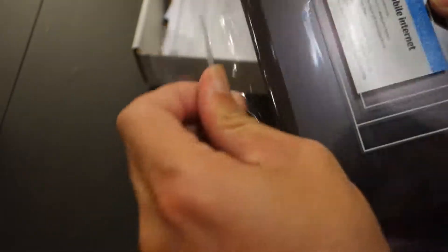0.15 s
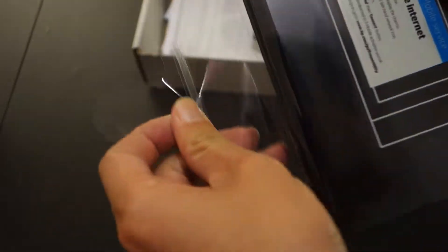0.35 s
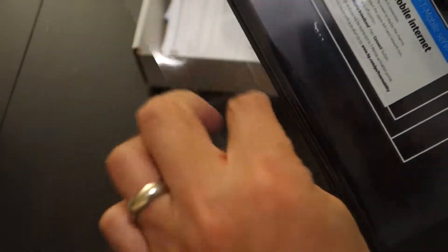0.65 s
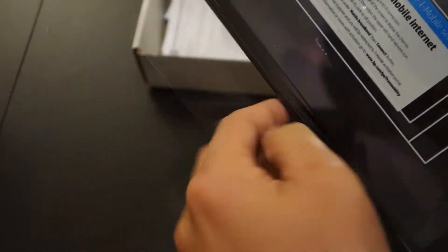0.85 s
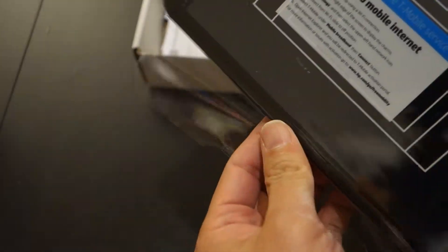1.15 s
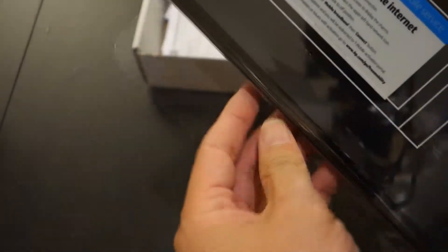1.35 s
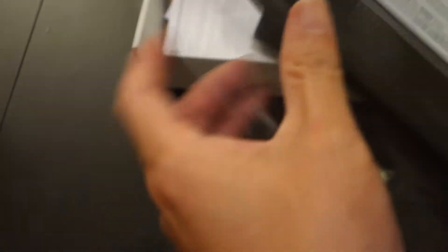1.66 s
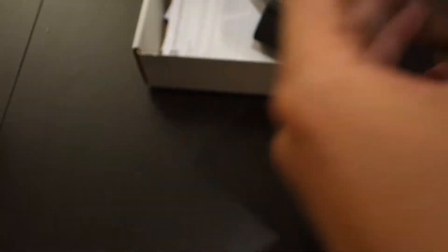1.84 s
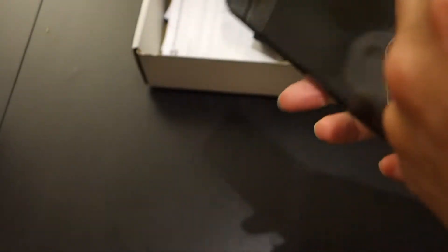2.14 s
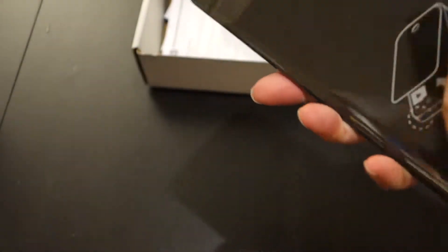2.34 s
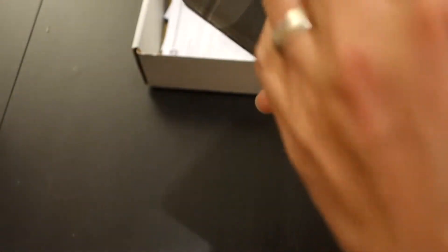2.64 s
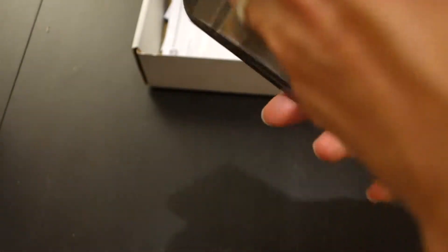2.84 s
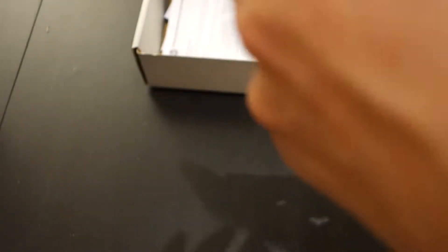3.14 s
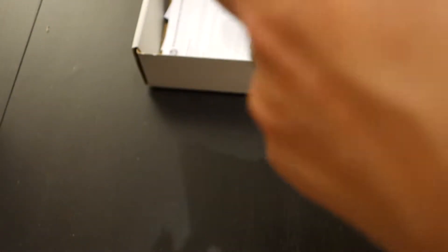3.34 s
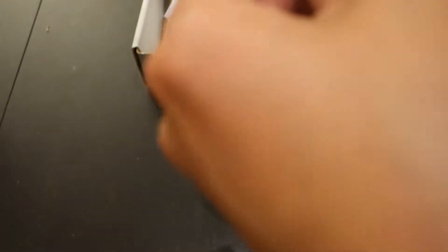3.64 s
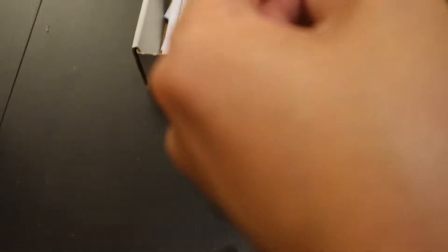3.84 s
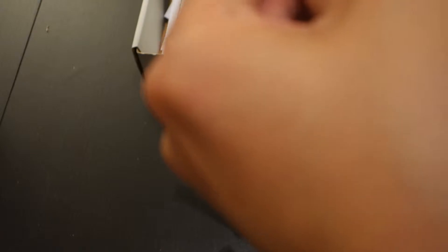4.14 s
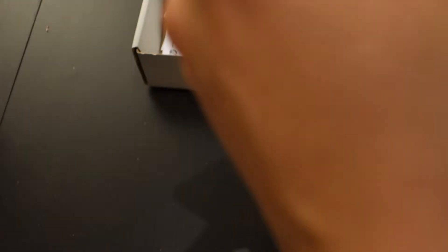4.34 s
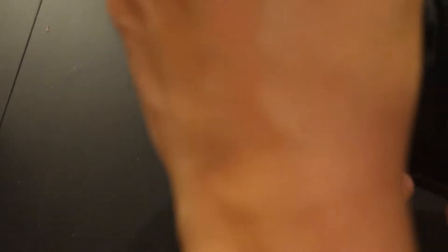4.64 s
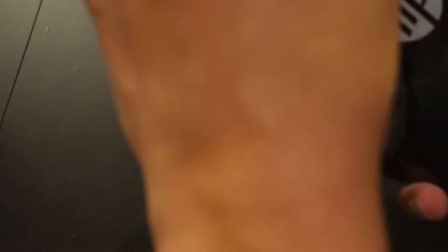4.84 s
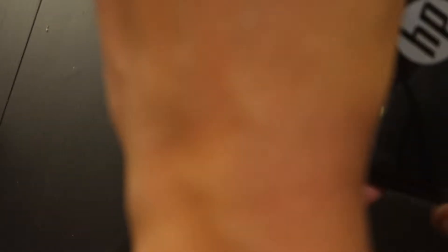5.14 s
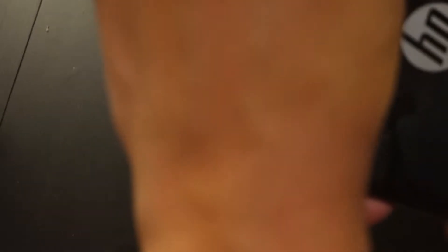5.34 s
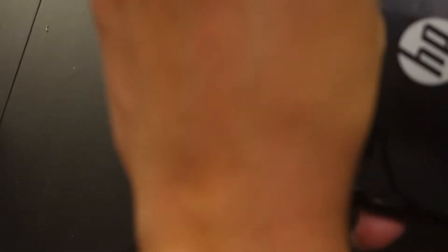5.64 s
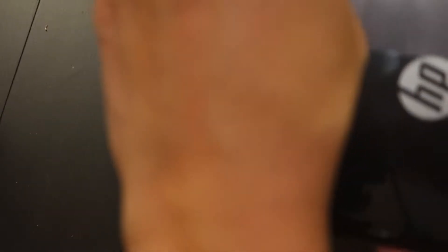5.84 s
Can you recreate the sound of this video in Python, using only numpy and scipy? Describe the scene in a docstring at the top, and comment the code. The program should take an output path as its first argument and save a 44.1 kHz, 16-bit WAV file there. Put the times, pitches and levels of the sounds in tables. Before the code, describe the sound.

Thin plastic wrapping crackles and pops as it is tugged off a hand-held device in uneven pulls. The stretched film rubs and hisses while fingers bump the casing softly. The handling pauses briefly, resumes with lighter crackles and tiny ticks, then gives another loud run of crinkles and fades. Everything is close, over the faint hush of a quiet room.

```python
"""Hands peel clear plastic film off a flat device, close to the microphone in a quiet room.
From the start, short pulls drag the film loose in many tiny slips. Creases snap, fingertips knock
softly on the casing and tight patches of film pop. From about one second, stretched film also rubs.
After a lull and more crackling, the film creeps off in faint ticks around the four-second mark.
Then it crackles loudly again and dies down to a light rustle."""
import sys
import numpy as np
from scipy import signal
from scipy.fft import rfft, irfft, next_fast_len
from scipy.io import wavfile
from scipy.ndimage import uniform_filter1d, map_coordinates

SR = 44100
rng = np.random.default_rng(int(sys.argv[2]) if len(sys.argv) > 2 else 0)


def generate_wav(sig):
    """Save sig (samples, or channels by samples) to the path in sys.argv[1] as 16-bit PCM at SR."""
    pcm = np.round(np.clip(np.atleast_2d(sig).T, -1, 1) * 32767).astype(np.int16)
    wavfile.write(sys.argv[1], SR, pcm)


N = 264159
TOP_HZ = 16500


def amp(db):
    """Turn decibels into a number to multiply by."""
    return 10 ** (np.asarray(db) / 20)


def unit(x):
    """Scale a sound to an average strength (rms) of 1."""
    return x / np.sqrt(np.mean(x ** 2) + 1e-20)


def along(points, hz):
    """Read between the rows of a (pitch_hz, value) table, with octaves evenly spaced."""
    pitches, values = np.transpose(points)
    return np.interp(np.log(hz + 1), np.log(pitches), values)


def filtered(x, response):
    """Turn each frequency of a sound up or down, and shift it in time, as response(hz) says."""
    n = x.shape[-1]
    padded = next_fast_len(n + min(n, SR // 4))
    return irfft(rfft(x, padded) * response(np.fft.rfftfreq(padded, 1 / SR)), padded)[..., :n]


def causal(points, hz):
    """A filter from (pitch_hz, level_db) rows that never sounds before its cause (minimum phase)."""
    cepstrum = irfft(np.log(amp(along(points, hz))))
    forward_only = np.r_[1, np.full(len(hz) - 2, 2), 1, np.zeros(len(hz) - 2)]
    return np.exp(rfft(cepstrum * forward_only))


def wobble(rate):
    """A smooth curve through `rate` random values a second."""
    values = rng.standard_normal(int(N * rate / SR) + 4)
    return map_coordinates(values, [np.arange(N) * rate / SR])


def add(track, start_s, level_db, sound):
    """Mix in a short sound, giving it as much energy as 1 ms at level_db."""
    energy = np.mean(np.sum(sound ** 2, axis=-1)) / (SR / 1000)
    part = track[:, int(start_s * SR):][:, :sound.shape[-1]]
    part += amp(level_db) * sound[..., :part.shape[1]] / np.sqrt(energy)


# How alike left and right sound (1 is the same): pitch_hz, likeness
LIKENESS = [(450, 0.95), (1000, 0.82), (2400, 0.64), (9000, 0.53)]
def spread(pair):
    """Share two unrelated sounds between left and right: alike in the bass, less so in the treble."""
    turn = lambda hz: np.arccos(np.clip(along(LIKENESS, hz), 0, 1)) / 2
    mid, side = filtered(pair, lambda hz: np.array([np.cos(turn(hz)), np.sin(turn(hz))]))
    return np.array([mid + side, mid - side])


# The tone of the still room: pitch_hz, relative_db
HUSH_TONE = [(25, -17.5), (100, -6), (320, 8), (600, 5.5), (16000, -9)]
def hush():
    """The quiet room gives a steady, soft noise."""
    noise = spread(rng.standard_normal((2, N)))
    return unit(filtered(noise, lambda hz: amp(along(HUSH_TONE, hz))))


# Pulls that drag the film along: start_s, length_s, rustle_db, hiss_above_rustle_db
FILM_PULLS = [(0, 0.097, -43.5, 6), (0.084, 0.045, -36, 11.5), (0.14, 0.014, -26, 1.5),
              (0.171, 0.032, -32.5, -2), (0.282, 0.022, -43, 3), (0.391, 0.15, -54.5, 9.5),
              (0.497, 0.022, -36.5, -0.5), (0.584, 0.03, -49.5, 7.5), (0.929, 0.13, -42.5, -7.5),
              (1.028, 0.034, -34.5, -17), (1.237, 0.051, -71, 22.5), (1.362, 0.15, -44, 1.5),
              (1.493, 0.12, -46.5, 3.5), (1.642, 0.075, -52.5, 7), (1.764, 0.033, -40, 1),
              (1.842, 0.024, -38, 7.5), (1.865, 0.12, -43, 3), (2.003, 0.115, -43.5, 6),
              (2.23, 0.04, -53, 4.5), (2.259, 0.084, -46, -6), (2.983, 0.012, -51, 6.5),
              (3.028, 0.09, -43, 0.5), (3.178, 0.052, -54, 8.5), (3.222, 0.01, -44, 9.5),
              (3.453, 0.016, -55, 16.5), (3.49, 0.11, -45, 3.5), (4.015, .15, -64, 10),
              (4.236, 0.031, -44.5, 10.5), (4.269, 0.042, -32, 1.5), (4.551, 0.017, -37, 3.5),
              (4.612, 0.011, -43, 1.5), (4.733, 0.034, -45, -4.5), (4.776, 0.09, -40, 2),
              (4.987, 0.02, -43.5, 0.5), (5.039, 0.038, -46, 8.5), (5.224, 0.011, -54, 9.5),
              (5.387, 0.08, -64.5, 16), (5.533, 0.017, -51, 7.5), (5.589, 0.07, -52.5, 6.5)]
# Loose film brushing the hands between pulls: time_s, rustle_db
BRUSHING = [(0, -41.5), (.25, -49), (.68, -55.5), (.76, -62), (.82, -53), (1.15, -52.5), (1.31, -59.5),
            (1.7, -53.5), (2.2, -53.5), (2.47, -69), (2.68, -77), (2.9, -70), (3.68, -65), (4.17, -61.5),
            (4.68, -56.5), (4.95, -51.5), (5.3, -64.5), (5.99, -59.5)]
def pulling(grab_s=0.012, release_db_per_s=278, crisp_db=5.5):
    """Rustle and hiss levels in dB: each pull grabs, holds and dies away, over the light brushing."""
    t = np.arange(N) / SR
    rustle_power = amp(np.interp(t, *np.transpose(BRUSHING))) ** 2
    hiss_power = rustle_power.copy()
    for start_s, length_s, rustle_db, extra_hiss_db in FILM_PULLS:
        near = slice(*np.searchsorted(t, [start_s - 4 * grab_s, start_s + length_s + .5]))
        rise = (1 + np.tanh(2 * (t[near] - start_s) / grab_s)) / 2
        fade_db_per_s = release_db_per_s * 2 ** (max(extra_hiss_db, 0) / crisp_db)  # hissy stops sooner
        pull = rise * amp(rustle_db - fade_db_per_s * np.maximum(t[near] - start_s - length_s, 0))
        rustle_power[near] += pull ** 2
        hiss_power[near] += (pull * amp(extra_hiss_db)) ** 2
    return 10 * np.log10([rustle_power, hiss_power])


def slips(per_s=1100, scatter_db=5, smooth_db=3, clump_db=2.0):
    """Tiny slips of very unequal size come in clumps, over smooth rubbing noise."""
    happens = rng.random((2, N)) < per_s / SR
    sizes = amp(scatter_db * np.clip(rng.standard_normal((2, N)), -2, 2))
    grains = unit(happens * sizes * np.sign(rng.standard_normal((2, N))))
    friction = amp(smooth_db) * rng.standard_normal((2, N))
    return unit(spread(grains + friction) * amp(clump_db * wobble(260)))


# The notes at which the hand-held casing rings: pitch_hz, width_hz, relative_db
CASING_NOTES = [(200, 68, -5.5), (309, 63.6, 4.5), (422, 101, 7), (563, 237, 0), (922, 200, 1)]
def casing(hz):
    """The casing answers a push with a few low notes that die quickly."""
    return sum((-1) ** k * amp(db) * 1j * hz * width / (pitch ** 2 - hz ** 2 + 1j * hz * width)
               for k, (pitch, width, db) in enumerate(CASING_NOTES))


def moving_band(path, time_s, hz, gain_db, sharpness):
    """Lift or lower one band, whose pitch follows a (time_s, pitch_hz) table."""
    ratio = (hz + 1) / np.interp(time_s, *np.transpose(path))
    return 1 + (amp(gain_db) - 1) / (1 + 1j * sharpness * (ratio - 1 / ratio))


# Where the free stretch of film rings: time_s, pitch_hz
FILM_PITCH = [(.08, 3740), (.14, 950), (.29, 2100), (.37, 2230), (.52, 1030), (1.95, 740), (2.1, 1470),
              (3.05, 3480), (4.3, 1900), (4.85, 3120), (5.03, 3760)]
def free_film(time_s, hz):
    """The peeled film rings broadly: low while slack, higher when held short."""
    return moving_band(FILM_PITCH, time_s, hz, gain_db=6, sharpness=0.89)


# The band that the device's reflection cancels: time_s, pitch_hz
HOLLOW_PITCH = [(.15, 1520), (1.95, 1830), (2.06, 5700), (4.85, 5900), (5.0, 990)]
def hollow(time_s, hz, depth_db):
    """Sound bouncing off the flat face changes one band, which moves as the device is turned."""
    return moving_band(HOLLOW_PITCH, time_s, hz, depth_db, sharpness=3.7)


def flexing(x, tone):
    """Shape a sound by tone(time_s, hz); small peaks come and go as the film bends."""
    hz, t, spectrum = signal.stft(x, SR, nperseg=256)
    peaks = uniform_filter1d(rng.standard_normal(spectrum.shape[1:]), size=2, axis=0)
    peaks = uniform_filter1d(peaks, size=18, axis=1)  # smooth over time
    gain = tone(t, hz[:, None]) * amp(2.7 * unit(peaks))
    return unit(signal.istft(spectrum * gain / np.linalg.norm(gain, axis=0))[1][:, :N])


# The tone of broad folds rubbing: pitch_hz, relative_db
RUSTLE_TONE = [(80, -40), (300, -48), (1050, 3), (1750, 1), (2200, 4), (3000, 5.5), (4200, 5.5), (6000, -6),
               (11000, -18.5)]
# The tone of fine slips at the peeling edge: pitch_hz, relative_db
HISS_TONE = [(100, -36), (700, -26.5), (2500, -36.5), (5000, 3.5), (12700, 3), (15700, -10), (16200, -31.5)]
def sliding(rustle_db, hiss_db, usual_rustle_db=-40, usual_hum_db=-51.5, hum_loss_db_per_s=1.5):
    """Film drags over skin and casing; the uneven pull makes hum, rustle and hiss waver together."""
    # the casing hums more under a hard pull, less under a hissy one and as the film comes off
    loss_db = 0.47 * (hiss_db - rustle_db) + hum_loss_db_per_s * np.arange(N) / SR
    hum_db = usual_hum_db + 0.57 * (rustle_db - usual_rustle_db) - loss_db
    hum = unit(filtered(slips(), casing))
    rustle_tone = lambda t, hz: amp(along(RUSTLE_TONE, hz)) * free_film(t, hz) * hollow(t, hz, 2)
    rustle = flexing(slips(per_s=650, smooth_db=1), rustle_tone)
    hiss = flexing(slips(smooth_db=10), lambda t, hz: amp(along(HISS_TONE, hz)))
    return amp(1.07 * wobble(45)) * (hum * amp(hum_db) + rustle * amp(rustle_db) + hiss * amp(hiss_db))


# The tone of a crease before its treble is rounded off: pitch_hz, relative_db
CREASE_TONE = [(70, -64), (500, -12.5), (1000, 3), (1600, 1), (2300, 3), (13000, 8.5), (15600, 2),
               (16400, -5)]
def snap(start_s, bright_hz, base_flutter_db=-14, flutter_above_hz=1310, shiver_s=0.07, ripple_db=3):
    """A crease gives, pushes sharply, flutters, then shivers; a quicker one has a higher bright_hz."""
    t = np.arange(SR // 20) / SR - .0007  # the push comes at t = 0
    # slow creases flutter longer and louder
    flutter_s = 0.0031 * (5000 / bright_hz) ** .7
    flutter_db = base_flutter_db + np.log2(8000 / bright_hz)
    flutter = amp(flutter_db - 60 * np.abs(t) / flutter_s)
    shiver = (t > 0) * amp(-27 - 60 * t / shiver_s)
    flutter_noise, shiver_noise = (spread(rng.standard_normal((2, len(t)))) for _ in range(2))
    push = filtered(flutter_noise * flutter, lambda hz: 1j * hz / (flutter_above_hz + 1j * hz))
    push += shiver_noise * shiver
    push[:, np.argmax(flutter)] += 1
    # each crease has its own shape, so its own shallow peaks and dips
    bands = np.geomspace(CREASE_TONE[0][0], TOP_HZ, 90)
    tone = np.c_[bands, along(CREASE_TONE, bands) + ripple_db * rng.standard_normal(len(bands))]
    damping = 1.17 * (bright_hz / 6000) ** .3  # small, quick creases ring least
    roll_off = lambda hz: 1 / (1 - (hz / bright_hz) ** 2 + 1j * damping * hz / bright_hz)
    surroundings = lambda hz: free_film(start_s, hz) * hollow(start_s, hz, depth_db=-6)
    return filtered(push, lambda hz: causal(tone, hz) * roll_off(hz) * surroundings(hz))


def crinkle(rustle_db, per_s=18, above_rustle_db=9, cap_db=-32.5, scatter_db=4, middle_hz=6500):
    """Small creases give way at random, more often and louder the harder the film is pulled."""
    out = np.zeros((2, N))
    strain = np.cumsum(amp(rustle_db))
    for when, size, quickness in rng.random((int(per_s * N / SR), 3)):
        at = np.searchsorted(strain, when * strain[-1])
        level_db = min(rustle_db[at] + above_rustle_db, cap_db) + scatter_db * (2 * size ** 2 - 1)
        add(out, at / SR, level_db, snap(at / SR, middle_hz * 2 ** (2 * quickness - 1)))
    return out


def knock(rattle_db, rattle_s):
    """A jolt rings the casing; the grip makes each knock a little different."""
    t = np.arange(SR // 10) / SR
    jolt = rng.standard_normal(len(t)) * amp(rattle_db - 60 * t / rattle_s)
    jolt[0] += 1
    return filtered(jolt, casing)


# The main creases that snap: start_s, level_db, bright_hz, knock_db
CREASE_SNAPS = [(0.08, -12.5, 7970, -57), (0.1449, -10.5, 3700, -37), (0.1512, -9, 5120, -20.5),
                (0.2005, -11, 12500, -32), (0.2033, -19, 6560, -46), (0.2926, -16.5, 6600, -31),
                (0.3055, -22.5, 9200, -38), (0.3665, -14.5, 2460, -25.5), (0.383, -24, 3730, -40),
                (.437, -23.5, 10600, -38), (0.4963, -19, 7800, -49), (0.652, -20.5, 4300, -25.5),
                (0.6974, -26.5, 7300, -36), (1.0477, -31, 2330, -55), (1.5928, -21.5, 4000, -27.5),
                (1.7713, -20.5, 5200, -35), (1.7788, -15, 6300, -41.5), (1.7818, -20.5, 10440, -43.5),
                (1.8375, -16, 15000, -34.5), (1.8765, -17, 4660, -37), (1.926, -18, 2880, -28.5),
                (1.9532, -22, 4670, -36), (1.994, -21, 8050, -29.5), (2.0797, -23, 14000, -50),
                (2.082, -11.5, 11000, -41), (2.2814, -23, 6100, -53), (2.2895, -26, 3970, -52),
                (2.3296, -23, 3540, -42), (2.8086, -37, 3680, -45), (2.864, -38, 3200, -36.5),
                (3.085, -25.5, 3660, -41), (3.442, -32.5, 11300, -48), (3.4926, -29, 5070, -34),
                (3.553, -23, 3380, -36.5), (3.7447, -36.5, 7950, -58), (3.7608, -38, 7400, -61),
                (4.211, -25.5, 2740, -38.5), (4.251, -15, 2960, -33), (4.2588, -13, 10500, -45),
                (4.2787, -12.5, 10500, -66), (4.7928, -14.5, 4100, -33.5), (4.8262, -11.5, 7300, -40.5),
                (5.03, -14.5, 12100, -55), (5.1012, -22.5, 3400, -62), (5.697, -34.5, 2130, -60)]
def crackle():
    """Each main crease sounds twice over: as a snap in the film and a knock in the casing."""
    out = np.zeros((2, N))
    for start_s, level_db, bright_hz, knock_db in CREASE_SNAPS:
        add(out, start_s, level_db, snap(start_s, bright_hz))
        add(out, start_s, knock_db, knock(rattle_db=-26.5, rattle_s=0.073))
    return out


# Fingertips and palm bumping the casing (heavier is duller): start_s, level_db, bright_hz
FINGER_TAPS = [(0.112, -34, 485), (0.147, -25, 235), (0.54, -34, 520), (0.578, -33.5, 520),
               (1.498, -34.5, 480), (2.406, -41, 272), (3.726, -39.5, 338), (3.782, -44, 278),
               (3.905, -46.5, 294), (5.029, -33.5, 271), (5.102, -37, 277), (5.714, -39.5, 375)]
def taps():
    """Flesh lands softly, so only the lowest notes of the casing answer."""
    out = np.zeros((2, N))
    for start_s, level_db, bright_hz in FINGER_TAPS:
        soften = lambda hz: 1 / (1 + 1j * hz / bright_hz - (hz / bright_hz) ** 2)
        add(out, start_s, level_db, filtered(knock(rattle_db=-32, rattle_s=0.07), soften))
    return out


# Tight patches of film that pop: start_s, level_db, pitch_hz
FILM_POPS = [(.1517, -14.5, 995), (0.2925, -18.5, 2280), (.367, -23.5, 1100), (.652, -26, 482),
             (0.6522, -20.5, 1080), (1.838, -12, 11600), (1.925, -21.5, 875), (2.0792, -26.5, 1410),
             (2.264, -31, 1280), (2.8645, -37, 1010), (4.7953, -27, 1760), (5.793, -47, 1100)]
def pops(ring_cycles=13.4):
    """A patch of film rings briefly on one note: the larger the patch, the lower and longer."""
    out = np.zeros((2, N))
    for start_s, level_db, pitch_hz in FILM_POPS:
        cycles = pitch_hz * np.arange(SR // 20) / SR
        rise = 1 - np.exp(-2 * cycles)
        swing = np.sin(2 * np.pi * cycles) * rise * amp(-60 * cycles / ring_cycles)
        add(out, start_s, level_db, np.diff(swing))  # thin film gives no bass
    return out


# Rubs of tightly stretched film: start_s, length_s, level_db, pitch_hz
FILM_RUBS = [(0.912, 0.2, -44, 3950), (1.011, 0.083, -39, 1110), (1.337, 0.16, -44.5, 4140),
             (2.05, 0.24, -53.5, 1450), (2.7, 0.394, -65.5, 4100), (3.04, 0.15, -51, 3900),
             (4.539, .05, -37.5, 4120), (5.834, 0.15, -59.5, 2120)]
def rubbing(width_hz=700):
    """Slips make the tight film ring around one pitch; each rub swells and fades."""
    out, drive = np.zeros((2, N)), slips()
    for start_s, length_s, level_db, pitch_hz in FILM_RUBS:
        part = slice(int(start_s * SR), int((start_s + length_s) * SR))
        ring = lambda hz: (1j * hz * width_hz / (pitch_hz ** 2 - hz ** 2 + 1j * hz * width_hz)) ** 1.5
        rub = unit(filtered(drive[:, part], ring))
        out[:, part] += amp(level_db) * rub * signal.windows.tukey(rub.shape[1], .5)
    return out


# Ticks as the film creeps off the casing: start_s, level_db
CREEP_TICKS = [(3.691, -46.5), (3.9276, -36), (3.947, -36.5), (4.026, -42), (4.046, -41), (4.053, -29.5),
               (4.149, -34), (4.163, -35.5), (4.201, -34)]
def creep(thin_hz=5000):
    """The clinging film sticks and slips, letting go in small, thin, ragged ticks."""
    out = np.zeros((2, N))
    for start_s, level_db in CREEP_TICKS:
        tick = snap(start_s, bright_hz=13000, base_flutter_db=-6)
        add(out, start_s, level_db, filtered(tick, lambda hz: 1j * hz / (thin_hz + 1j * hz)))
    return out


# How long the room's echo takes to fade by 60 dB: pitch_hz, fade_s
ECHO_FADE = [(200, 0.74), (4000, 0.46)]
def room(x):
    """The table and near walls throw the sound back; the treble dies first."""
    hz, t, noise = signal.stft(rng.standard_normal((2, SR // 2)), SR, nperseg=256)
    fade = amp(-60 * t / along(ECHO_FADE, hz)[:, None])
    echo = spread(signal.istft(noise * fade, SR)[1])
    echo *= 1 - np.exp(-np.arange(echo.shape[1]) / SR / 0.0011)  # a soft start
    return signal.fftconvolve(x, echo / np.linalg.norm(echo[0]), axes=1)[:, :N]


# Level change on the left, the opposite on the right, before the drift scales it: pitch_hz, left_db
SIDE_BALANCE = [(400, 0.1), (1100, -1.15), (2200, -1.6), (10000, -1)]
def drift_right(x, left_delay_s=1.8e-5):
    """The right side hears the film a touch earlier, and louder the further the hands drift."""
    x = filtered(x, lambda hz: np.exp(-2j * np.pi * hz * np.array([[left_delay_s], [0]])))
    lean = filtered(x, lambda hz: amp([along(SIDE_BALANCE, hz), -along(SIDE_BALANCE, hz)]) - 1)
    return x + np.linspace(.6, 1.6, N) * lean


def scene():
    """Film and casing drift to the right over the room's hush; only the short sounds echo."""
    rustle_db, hiss_db = pulling()
    clicks = crackle() + taps() + pops() + creep() + crinkle(rustle_db)
    film = clicks + amp(-15) * room(clicks) + sliding(rustle_db, hiss_db) + rubbing()
    return drift_right(film) + amp(-67) * hush()


def record(dry, ceiling=.92):
    """The recorder rounds off the highest peaks and keeps nothing above TOP_HZ."""
    rounded = dry / (1 + (dry / ceiling) ** 8) ** .125
    return filtered(rounded, lambda hz: hz < TOP_HZ)


dry = scene()
out = record(dry)
generate_wav(out)
```